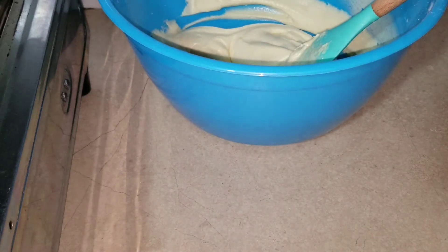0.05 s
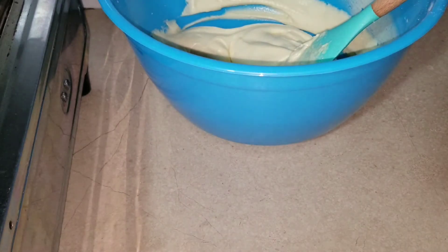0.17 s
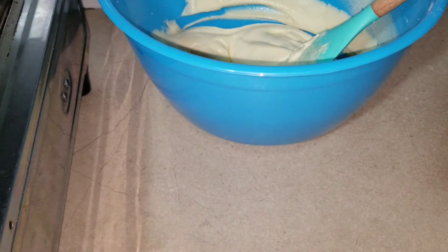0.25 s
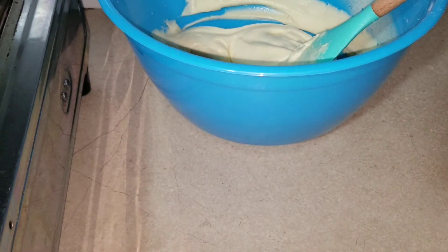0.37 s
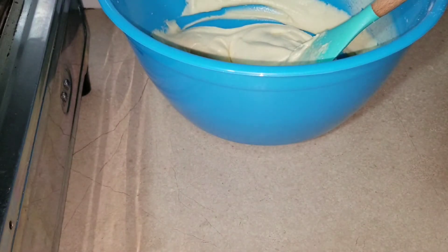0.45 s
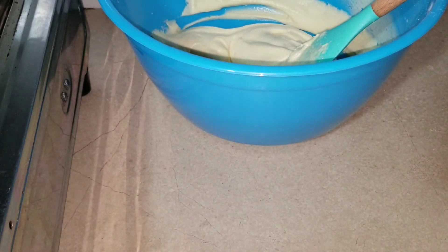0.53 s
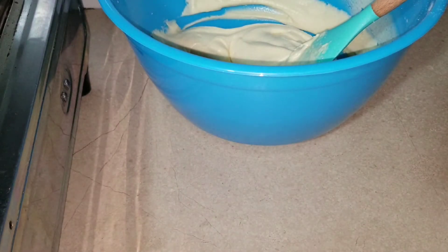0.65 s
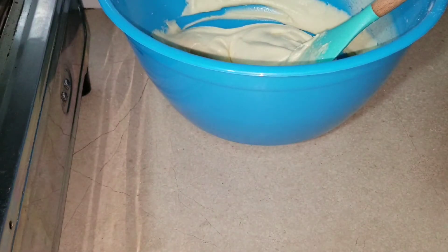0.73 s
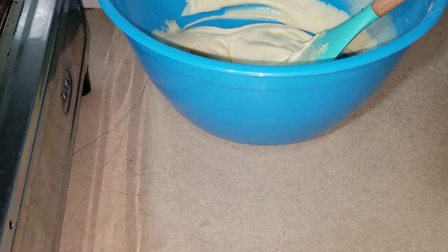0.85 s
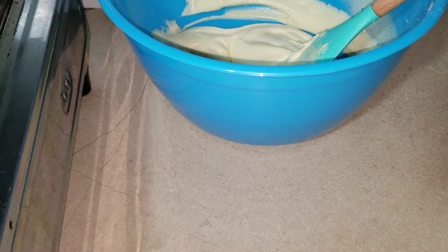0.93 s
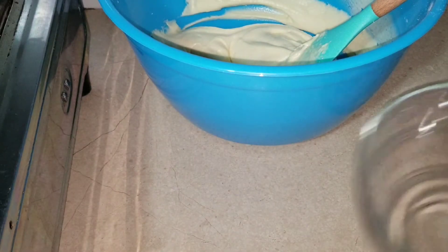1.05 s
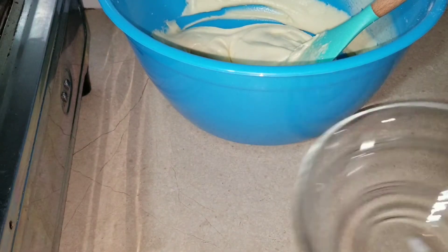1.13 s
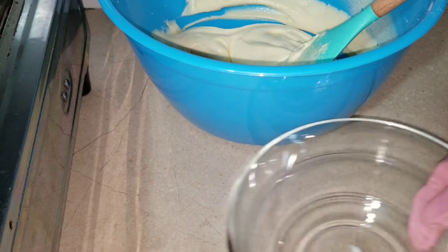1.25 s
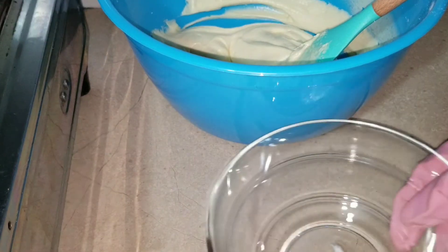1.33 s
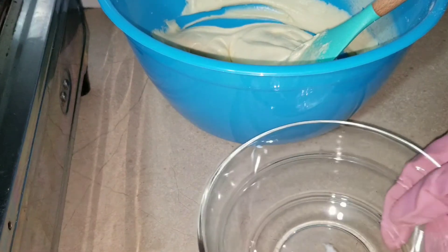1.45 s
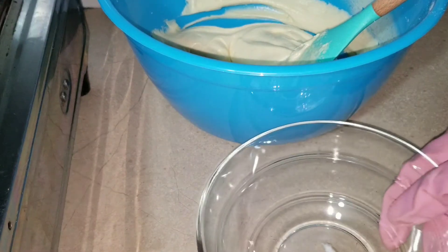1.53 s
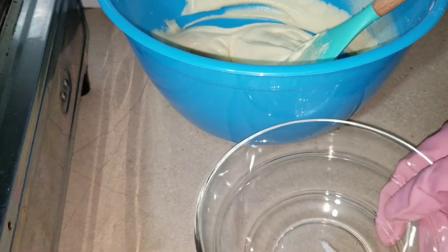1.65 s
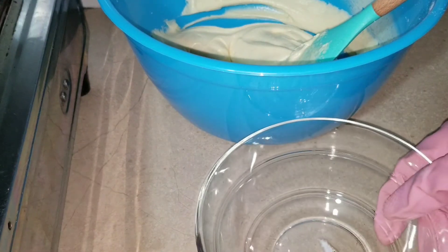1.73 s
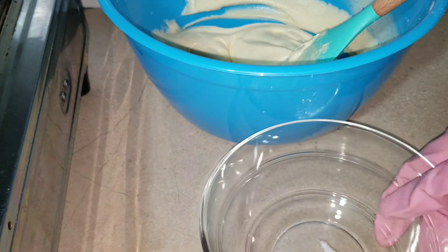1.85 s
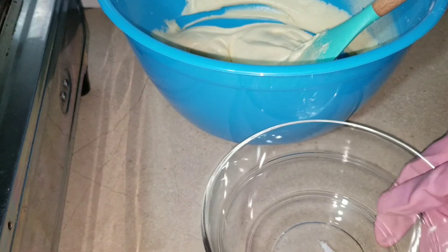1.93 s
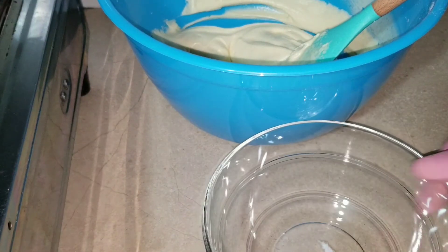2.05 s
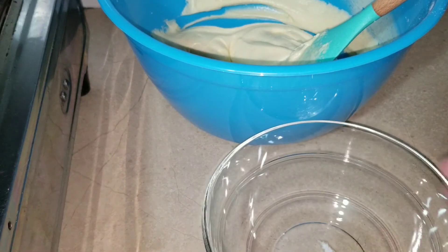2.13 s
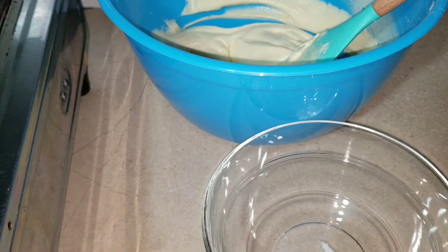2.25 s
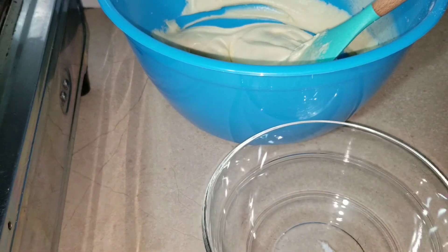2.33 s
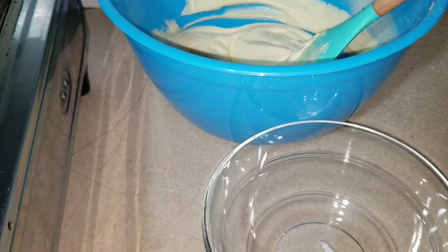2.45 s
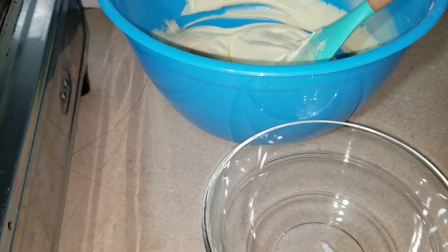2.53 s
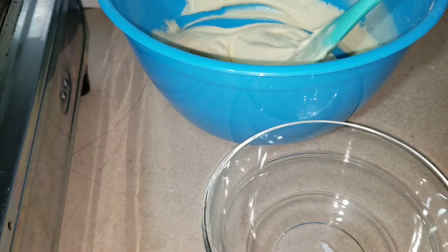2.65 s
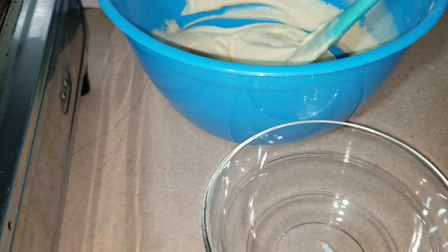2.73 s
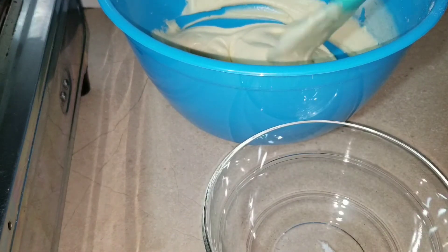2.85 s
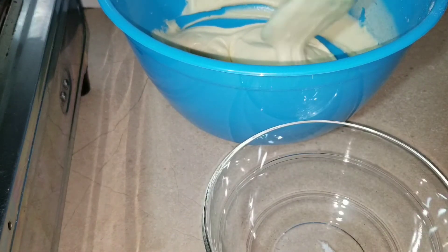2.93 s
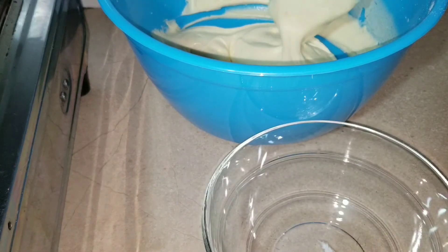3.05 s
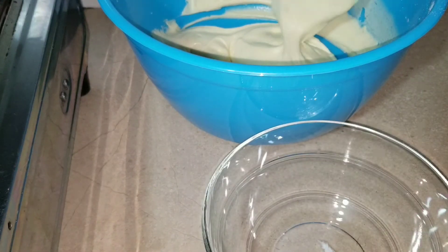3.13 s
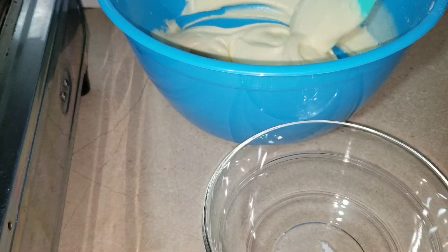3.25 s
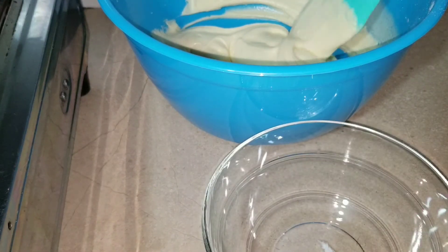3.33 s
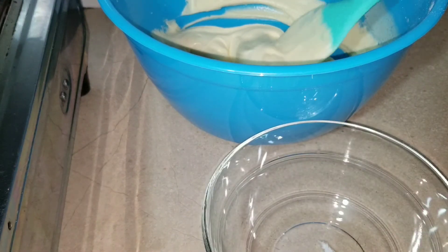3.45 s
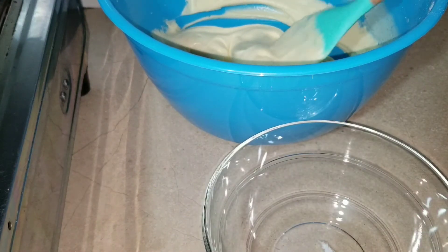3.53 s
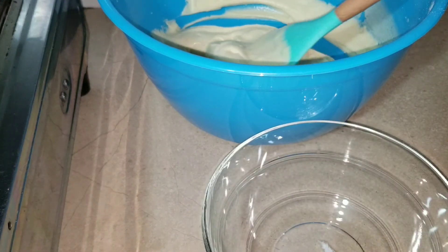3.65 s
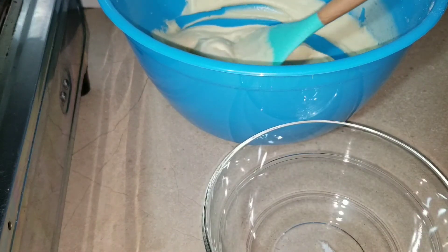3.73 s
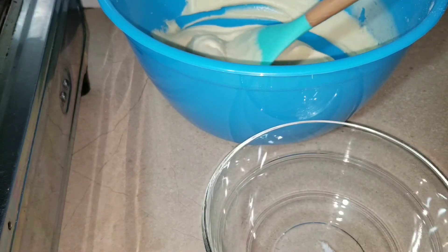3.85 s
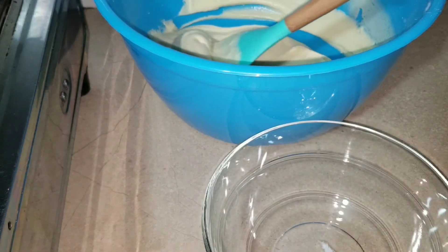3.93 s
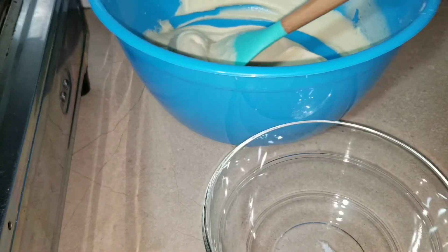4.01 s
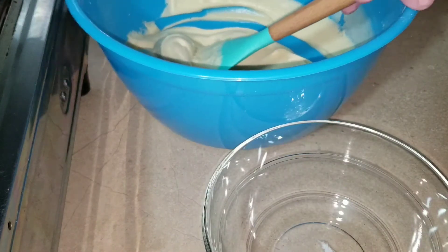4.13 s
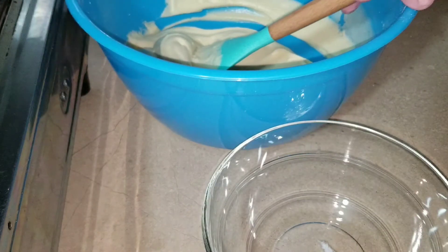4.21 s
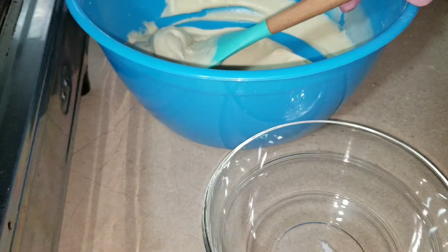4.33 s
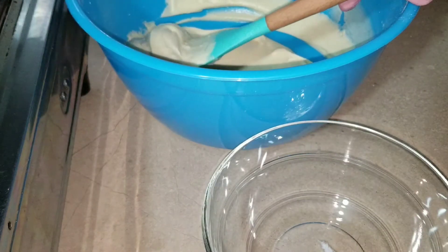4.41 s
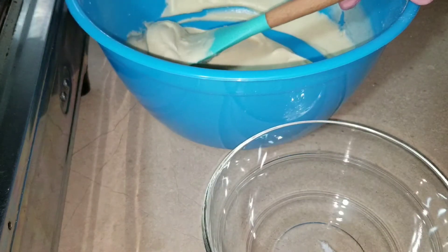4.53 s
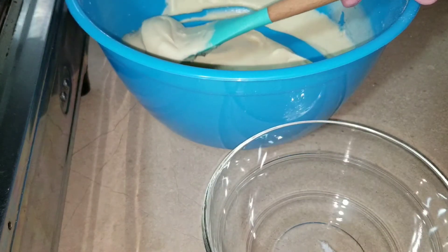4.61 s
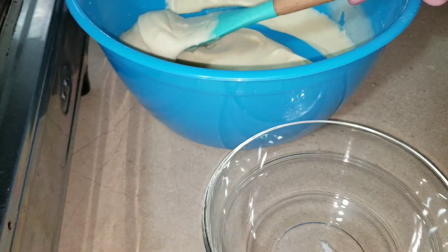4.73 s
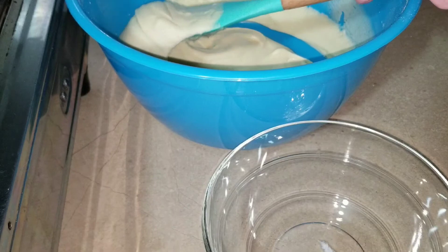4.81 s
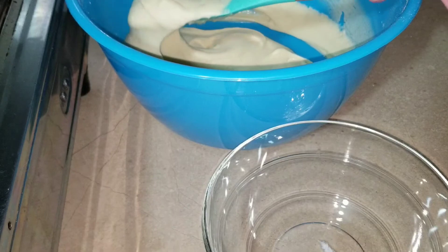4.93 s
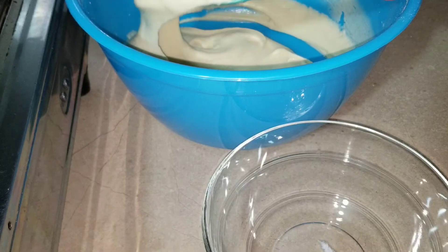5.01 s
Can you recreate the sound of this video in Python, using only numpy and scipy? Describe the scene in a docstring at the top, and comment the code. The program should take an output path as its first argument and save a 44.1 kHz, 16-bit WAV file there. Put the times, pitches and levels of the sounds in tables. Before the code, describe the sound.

A close stereo pickup in a small, hard kitchen, with a quiet low appliance rumble and wavering drone throughout. For the first 1.4 s there are only hum swells and very faint rubber-glove rustles and wet batter sounds. At 1.45 s a glass bowl hits the counter: about six uneven knocks until 1.57 s, hard and mid-pitched near 900 Hz, with cabinet thud and hand-damped glassy pings. At 1.81 s it drops flat in a double knock, rattling quickly to rest by about 1.93 s, with a thin, freer glass ring fading briefly. Small ticks, squelches and a soft rustle follow at 2.0-2.45 s. A dull, moderately firm spatula knock on the plastic bowl comes at 3.10 s with a softer one just after, then a lower thump and small clicks at 3.39-3.47 s. A soft, smooth sliding hiss runs 3.8-4.06 s. Then mostly hum, with a barely audible squelch near 5.03 s.

```python
"""Glass bowl on a kitchen counter

A glass mixing bowl, held in a rubber glove, clatters onto a counter, then drops flat and rings.
A spatula knocks in the plastic bowl of batter beside it, and something slides briefly over the counter.
Knocks and rings are sums of fading tones plus short noise bursts; rustles, squelches and the slide are swelling noise.
An appliance hums in the small kitchen, made of coloured noise and wavering tones."""
import sys
import numpy as np
from scipy import signal
from scipy.io import wavfile
from scipy.ndimage import uniform_filter1d

SR = 44100
rng = np.random.default_rng(int(sys.argv[2]) if len(sys.argv) > 2 else 0)


def wrap_up_sound(samples):
    """Save the sound to the file named by the first command line argument, as 16-bit audio."""
    columns = np.atleast_2d(samples).T
    # keep every value between -1 and 1, then stretch to whole-number steps
    tamed = np.clip(columns, -1, 1)
    steps = np.round(tamed * 32767).astype(np.int16)
    wavfile.write(sys.argv[1], SR, steps)


N = 223656
T = np.arange(N) / SR   # time in the scene (s)
AGE = T[:SR]   # time since a blow (s)

# In tables of tones, t60 is the time to fade by 60 dB; each blow varies the levels a little.
# "dB per Hz" is the relative strength of noise; its overall level is set elsewhere.

# Third-octave noise bands. Each row: low edge in Hz, high edge in Hz, filter.
BAND_EDGES = 20 * 2 ** (np.arange(30) / 3)
BANDS = [(low, high, signal.butter(2, [low, high], "band", fs=SR, output="sos"))
         for low, high in zip(BAND_EDGES, BAND_EDGES[1:])]
# How alike left and right are in noise. Each row: frequency in Hz, likeness from 0 to 1.
STEREO_LIKENESS = [(50, 0.94), (150, 0.91), (300, 0.99), (600, 0.098), (2000, 0.011), (10000, .02)]

# Deep bass of the appliance. Each row: frequency in Hz, strength in dB per Hz.
BASS_COLOUR = [(20, -4), (30, -4.5), (40, -6), (52, -1.5), (65, 2), (90, -26.5)]
# Its changing level, before a small trim. Each row: time in seconds, level in dB.
BASS_LEVEL = [(0.0, -59), (0.27, -52), (0.55, -66), (1.79, -61.5), (2.26, -63), (2.51, -53.5),
              (3.59, -51.5), (3.95, -58), (5.07, -57.5)]
# Steady rumble above the bass. Each row: frequency in Hz, strength in dB per Hz.
RUMBLE_COLOUR = [(60, -8.5), (80, 7), (105, 0.5), (125, 10), (150, -11.5), (200, -23)]
# Upper part of the drone. Each row: frequency in Hz, strength in dB per Hz.
DRONE_COLOUR = [(230, -19), (320, -1), (420, -1.5), (490, -9), (580, 0), (700, -9), (900, -38.5),
                (1500, -36)]
# Lower part of the drone. Each row: frequency in Hz, strength in dB per Hz.
LOW_DRONE_COLOUR = [(120, -12), (160, -5), (215, -2), (270, 6), (340, -24.5)]
# Changing level of the drone. Each row: time in seconds, level in dB.
DRONE_LEVEL = [(0, -57.5), (2.2, -60), (2.7, -61), (5.07, -61.5)]
# Faint hiss. Each row: frequency in Hz, strength in dB per Hz.
HISS_COLOUR = [(700, 6), (1500, 4.5), (2800, 2.5), (4500, 0.5), (7400, -1.5), (8400, -5.5), (13000, -3)]
# Humming tones of the appliance. Each row: frequency in Hz, average level in dB.
HUM_TONES = [(51.5, -60), (120, -61.5), (209, -68.5), (254, -68), (570, -71)]
# Passing swells of the hum. Each row: middle in seconds, half length in seconds, level in dB, centre in Hz.
HUM_SWELLS = [(0.173, 0.18, -50.5, 183.7), (0.304, 0.37, -57.5, 441), (0.406, 0.17, -48, 118),
              (0.953, 0.3, -56, 160.6), (2.159, .2, -59, 348.6), (2.562, 0.16, -45.5, 108.5)]
RUMBLE_DB, HISS_DB = -56, -74.5   # steady levels
LOW_DRONE_DB = 0   # relative to the upper drone

# Close surfaces. Each row: left delay in seconds, right delay in seconds, level in dB.
ECHOES = [(.0024, 0.0028, -26), (.0063, 0.0042, -10)]
# Fading of the room. Each row: frequency in Hz, t60 in seconds.
ROOM_T60 = [(100, 0.24), (300, 0.36), (900, .25), (2000, 0.28), (5000, 0.25), (12000, 0.19)]
# Colour of the room. Each row: frequency in Hz, level in dB.
ROOM_COLOUR = [(80, -4.5), (300, 0.5), (900, -1), (2000, -3), (5000, -1), (13000, 3)]
CUTOFF_HZ = 13000

# Colour shared by ticks, rustles and squelches. Each row: frequency in Hz, level in dB.
CONTACT_COLOUR = [(700, 17), (1100, 11.5), (2000, 4), (4000, 0.5), (7200, 2.5), (8400, -3.5), (11000, -4)]
# Soft rustles: the glove rubbing, and batter being lifted.
# Each row: middle in seconds, half length in seconds, level in dB, centre in Hz.
RUSTLES = [(0.016, .07, -67.5, 3400), (0.381, 0.24, -79.5, 5270), (0.577, .036, -69, 2400),
           (1.074, .021, -69.5, 6500), (2.196, .04, -63.5, 2550), (2.281, 0.28, -72, 3900),
           (2.926, .09, -76.5, 2520), (3.431, 0.065, -68.5, 2300)]
# Brief wet squelches of the batter. Each row: middle in seconds, half length in seconds, level in dB.
SQUELCHES = [(0.336, 0.015, -69.5), (0.494, 0.012, -69), (2.172, 0.0066, -55), (2.234, 0.005, -61),
             (2.364, 0.0088, -59), (2.429, 0.016, -61.5), (5.028, 0.052, -76)]
RUSTLE_OCTAVES = 1   # width of a rustle
SQUELCH_HZ, SQUELCH_OCTAVES = 1930, 0.22   # centre and width

# One short push over the counter. Each row: frequency in Hz, strength in dB per Hz.
SLIDE_COLOUR = [(710, -8.5), (1200, -9.5), (1790, -8.5), (1860, 18.5), (2510, -9), (2660, -4), (4050, -3),
                (4660, 0), (13000, -6)]
SLIDE_START_S, SLIDE_END_S, SLIDE_DB = 3.806, 4.06, -54.5
SLIDE_ATTACK_S, SLIDE_RELEASE_S = 0.085, 0.075

# Spatula and fingers on the plastic bowl. Each row: start in seconds, body level in dB, body treble limit in Hz,
# tick level in dB, tick centre in Hz, tick width in octaves, handle level in dB.
TAPS = [(2.032, -55, 1500, -52, 1730, 0.26, -60), (2.386, -57, 2500, -46, 4230, 0.78, -64),
        (2.394, -74, 1790, -42.5, 2050, 0.43, -58), (3.098, -35.5, 3040, -42, 2130, 0.85, -46),
        (3.1356, -45, 1500, -55, 1500, 0.55, -63.5), (3.392, -39.5, 420, -50.5, 2390, .57, -48),
        (3.408, -61, 450, -60, 2130, 0.41, -51.5), (3.447, -57.5, 890, -58, 1250, .3, -57),
        (3.473, -61, 990, -53.5, 2680, 0.73, -44)]
# Plastic bowl, damped by batter. Each row: frequency in Hz, level in dB, t60 in seconds, right minus left in dB.
PLASTIC_TONES = [(275, -8.5, 0.12, 8), (431, -3, 0.049, 9), (562, 1, 0.051, 8), (737, -5.5, .05, 5),
                 (843, 2.5, 0.033, 12), (897, -6.5, 0.083, 6), (962, -18, 0.082, 2), (1045, 3, 0.042, 3),
                 (1536, -10, 0.066, -4), (1717, -6, .04, 8)]
# Dry thump under the plastic tones. Each row: frequency in Hz, strength in dB per Hz.
THUMP_COLOUR = [(200, 3), (550, -0.5), (1000, -44), (1700, 9), (3000, 5)]
# Wooden spatula handle. Each row: frequency in Hz, level in dB, t60 in seconds, right minus left in dB.
HANDLE_TONES = [(1803, -3.5, 0.026, 6.5), (2050, 1, 0.033, 5), (2392, -2, 0.028, 1), (3430, -9, 0.033, 10),
                (4100, -10.5, 0.024, 10)]
REBOUND_S, REBOUND_DB = 0.013, -16.5   # each tap touches again, softer
TAP_THUD_DB = -0.5   # the cabinet under a tap, relative to the body

# The cabinet below. Each row: frequency in Hz, level in dB, t60 in seconds, right minus left in dB.
CABINET_TONES = [(118, 0, .16, 2), (212, -21, .14, 1)]
THUD_RISE_S = 0.0086   # the heavy cabinet is slow to get going

# Touches as the foot rattles to rest. Each row: frequency in Hz, strength in dB per Hz.
SETTLE_COLOUR = [(600, 0), (1050, 5), (1700, 5), (2600, -6), (4000, -2), (7000, -27), (12000, -34)]
SETTLE_S, SETTLE_GAP_S = 1.825, 0.0085   # start, average time between touches
SETTLE_DB, SETTLE_DB_PER_S = -39, -150   # starting level and its fall, before uneven strength

# Glass bowl meets counter. Each row: start in seconds, force in dB, contact pitch in Hz, counter top in dB,
# treble limit in Hz, cabinet thud in dB, rim in dB, ping in dB, clink in dB, shimmer in dB.
# The levels after the force are relative to it.
LANDINGS = [(1.4469, -13.5, 914, 0, 3600, -11, -30, -37, -50.5, -37),
            (1.498, -14, 952, -0.5, 2700, -10.5, -38, -23.5, -35, -39),
            (1.5273, -18, 953, -1, 6520, -16, -16, -15, -20.5, -35.5),
            (1.548, -21, 990, -3, 2400, -24, -34, -42.5, -42, -47),
            (1.561, -20.5, 870, 0, 2270, -27, -30.5, -44, -44, -40),
            (1.5735, -29, 775, -5, 5200, -25, -38, -34, -39, -26),
            (1.8134, -15, 1040, -4.5, 5000, -17.5, -22.5, -24, -39, -31.5),
            (1.8162, -20, 1105, -4, 4630, -32, -33, -28.5, -50.5, -27.5),
            (1.8306, -26, 776, 0, 3000, -31, -50, -59, -44, -43),
            (1.842, -26, 860, 3, 3500, -21.5, -49, -48, -49, -41.5)]
# Bowl foot and counter top together. Each row: frequency in Hz, level in dB, t60 in seconds, right minus left in dB.
COUNTER_TONES = [(352.5, -29, 0.11, 10), (450.3, -28, 0.12, 11), (480, -26.5, 0.17, 4.5),
                 (547, -23.5, .11, 6), (636, -24, .07, 8), (788, -16, .065, 10), (954, -26.5, .1, 5),
                 (1005, -27, .08, 2.5), (1074, -17, 0.031, 3.5), (1384, -20, 0.047, 0),
                 (1550, -16.5, 0.042, 4.5), (1703, -25, .045, -2), (1797, -19, 0.048, 8.5),
                 (2013, -20.5, 0.053, 11), (2190, -22, .043, 2)]
# Crack of a hard contact. Each row: frequency in Hz, strength in dB per Hz.
CRACK_COLOUR = [(150, -10), (540, -6.5), (950, 5), (2000, 0.5), (2900, -17), (4500, -20), (7000, -7.5),
                (8000, -26.5), (10000, -13), (13000, -5)]
# The slab booms on in many close tones. Each row: frequency in Hz, strength in dB per Hz.
SLAB_COLOUR = [(180, -6), (350, 0), (600, 0.5), (1000, 0.5), (1300, -5), (1900, 4), (2400, -12), (2900, -3)]
CONTACT_T60, CONTACT_DB = 0.014, 5.5   # short pitched knock (s, dB relative to the force)

# For the glass tables, t60 holds before the hand's damping.
# Slow bending of the rim; its strongest tone is a close pair that swells and fades.
# Each row: frequency in Hz, level in dB, t60 in seconds, right minus left in dB.
RIM_TONES = [(706, -5, .7, 2), (1586, 4.5, .42, 2), (1581, .5, .42, 2), (1868, -9, .2, 2),
             (2003, -11, .12, 2), (2180, -12, .22, 2), (2470, -14, .15, 2), (2545, -15, .2, 2),
             (2632, -15, .14, 3), (2715, -15, .18, 3), (3115, -15, .16, 4), (3488, -21, .13, 4)]
# Bright wall tones, split into close pairs by uneven thickness.
# Each row: frequency in Hz, level in dB, t60 in seconds, right minus left in dB.
PING_TONES = [(5551, 0, .15, 7), (5762, -9, .05, 5), (5639, -8, .09, 5), (5490, -13, .07, 5),
              (5930, -6, .035, 5), (6260, -11, .03, 5)]
# Higher wall tones. Each row: frequency in Hz, level in dB, t60 in seconds, right minus left in dB.
CLINK_TONES = [(8425, -3, .25, 1), (8560, -9, .05, 2), (8461, 0, .17, 3)]
# Highest wall tones. Each row: frequency in Hz, level in dB, t60 in seconds, right minus left in dB.
SHIMMER_TONES = [(8511, -3, .17, -2), (8610, -7, .09, 1), (9400, -10, .2, 0), (9857, -3, .11, 0),
                 (9965, -2, .16, -3), (10010, -4, .15, -2), (11165, -4, .11, 0), (11040, -8, .08, 0),
                 (12042, -6, .08, 0), (12360, -6, .14, 0)]
HELD_DAMPING, LOOSE_DAMPING = 30, 1.5   # by the hand (1/s)
WALL_DAMPING_SHARE = 0.66   # the hand damps the wall less than the rim
LOOSEN_S = 1.7   # the grip loosens before the last drop
CHATTER_DEPTH, CHATTER_PER_S = 0.25, 220   # spread of the flutter, random points per second


def from_db(db):
    """Turn decibels into gain."""
    return 10 ** (np.asarray(db) / 20)


def rms_one(x):
    """Scale a sound to an average strength (rms) of 1."""
    return x / np.sqrt(np.mean(x ** 2) + 1e-20)


def at_hz(points, hz):
    """Read a table between its points, on a log-frequency axis."""
    table_hz, value = np.transpose(points)
    return np.interp(np.log(hz), np.log(table_hz), value)


def pan(right_db):
    """Give left and right gains that differ by this many decibels."""
    return from_db(np.array([[-.5], [.5]]) * right_db)


def add(out, s, sound):
    """Mix a sound in from time s."""
    start = round(s * SR)
    out[:, start:start + sound.shape[-1]] += sound[..., :N - start]


def bell(t, middle, half):
    """Rise and fall smoothly around the middle."""
    return np.exp(-((t - middle) / half) ** 2 / 2)


def drift(rate):
    """Wander slowly and randomly, with rms 1 and `rate` random points per second."""
    knots = rng.standard_normal(256)
    return rms_one(np.interp(T * rate, np.arange(len(knots)), knots))


def noise(spectrum, size=N, t60=None):
    """Stereo noise of rms 1, built from bands with their own likeness and, if given, fading."""
    out = 0
    white = rng.standard_normal((2, 2, size + 4096))   # the extra start lets the filters settle
    for k, (low, high, band_pass) in enumerate(BANDS):
        hz = np.sqrt(low * high)
        if high < spectrum[0][0] or low > spectrum[-1][0]:
            continue
        # Neighbouring bands use different noise.
        mid, side = signal.sosfilt(band_pass, white[k % 2])[:, -size:]
        alike = np.clip(at_hz(STEREO_LIKENESS, hz), 0, 1)
        band = np.sqrt(1 + alike) * mid + np.sqrt(1 - alike) * side * [[1], [-1]]
        fade = 1 if t60 is None else np.exp(-np.log(1000) * T[:size] / at_hz(t60, hz))
        out = out + from_db(at_hz(spectrum, hz)) * band * fade
    return rms_one(out)


def hump(hz, octaves):
    """A hump-shaped noise spectrum, tinted by the colour of the contact."""
    grid = np.geomspace(400, 14000, 30)
    hump_db = -30 * np.log10(1 + (np.log2(grid / hz) / octaves) ** 2 / 2)
    return np.column_stack([grid, hump_db + at_hz(CONTACT_COLOUR, grid)])


def ring(modes, damping=0, port_s=0.0002):
    """A struck object rings in fading tones of alternating sign, which reach the left side later."""
    spread_db = rng.standard_normal(len(modes))
    age = np.maximum(AGE - [[port_s], [0]], 0)
    out = 0
    for k, (hz, db, t60, right_db) in enumerate(modes):
        gain = (-1) ** k * from_db(db + spread_db[k]) * pan(right_db)
        fade = np.exp(-(np.log(1000) / t60 + damping) * age)
        out = out + gain * np.sin(2 * np.pi * hz * age) * fade
    return out


def burst(spectrum, t60):
    """Many short-lived tones merge into a crack, made here as fading noise."""
    size = SR // 10
    crack = np.pad(noise(spectrum, size=size), ((0, 0), (0, SR - size)))
    return crack * np.exp(-np.log(1000) * AGE / t60)


def soften(x, hz):
    """A longer contact excites less treble, so cut above this limit."""
    return signal.sosfilt(signal.butter(2, min(hz, SR / 2 - 1000), fs=SR, output="sos"), x)


def background(bass_trim_db=1):
    """The appliance's rumble, drone and wavering hum, under a faint hiss."""
    bass_db = np.interp(T, *np.transpose(BASS_LEVEL)) + bass_trim_db
    drone_db = np.interp(T, *np.transpose(DRONE_LEVEL))
    rumble = from_db(bass_db) * noise(BASS_COLOUR) + from_db(RUMBLE_DB) * noise(RUMBLE_COLOUR)
    drone = from_db(drone_db) * (from_db(LOW_DRONE_DB) * noise(LOW_DRONE_COLOUR) + noise(DRONE_COLOUR))
    hiss = from_db(HISS_DB) * noise(HISS_COLOUR)
    hum = 0
    for hz, db in HUM_TONES:
        level = from_db(db + 2 * drift(4.2)) * np.sqrt(2)   # a sine of rms 1 peaks at sqrt(2)
        hum = hum + level * np.sin(2 * np.pi * hz * T + 0.72 * drift(6))
    return (rumble + hum) * pan(1.6) + drone * pan(5.4) + hiss * pan(0.76)


def swells(width=0.073):
    """Narrow bands of the hum rise and sink, made as filtered noise."""
    out = 0
    for s, half, db, hz in HUM_SWELLS:
        band = signal.butter(2, hz * np.exp([-width, width]), "band", fs=SR, output="sos")
        tone = rms_one(signal.sosfilt(band, rng.standard_normal(N)))
        out = out + from_db(db) * tone * bell(T, s, half)
    return out * pan(2.3)


def reflections(x):
    """Close surfaces throw the sound back within milliseconds."""
    out = 0
    for *lags, db in ECHOES:
        echo = np.array([np.interp(T - lag, T, side, left=0) for lag, side in zip(lags, x)])
        out = out + from_db(db) * echo
    return out


def kitchen(x, room_db=-0.4, build_s=0.00037):
    """A small hard room answers with a diffuse tail, made by convolving with fading noise."""
    build_up = 1 - np.exp(-(AGE / build_s) ** 2)
    tail = noise(ROOM_COLOUR, size=SR, t60=ROOM_T60) * build_up / np.sqrt(SR)
    mono = x.mean(axis=0)[None]
    return from_db(room_db) * pan(1.0) * signal.fftconvolve(mono, tail, axes=1)[:, :N]


def grainy_swell(s, half, hz, octaves, grain_db=-3.0):
    """One soft swell around time s, made as noise of uneven, grainy strength."""
    out = np.zeros((2, N))
    t = T[np.abs(T - s) < 3 * half]
    unevenness = rms_one(uniform_filter1d(rng.standard_normal(len(t)), size=150))
    grain = from_db(grain_db * unevenness)
    add(out, t[0], noise(hump(hz, octaves), size=len(t)) * grain * bell(t, s, half))
    return out


def rustles():
    """The glove rubs and batter is lifted, in broad, soft swells of noise."""
    return pan(8.7) * sum(from_db(db) * grainy_swell(s, half, hz, RUSTLE_OCTAVES) for s, half, db, hz in RUSTLES)


def squelches():
    """The wet batter squelches briefly, in narrow swells of noise."""
    return pan(6.8) * sum(from_db(db) * grainy_swell(s, half, SQUELCH_HZ, SQUELCH_OCTAVES)
                          for s, half, db in SQUELCHES)


def slide():
    """Fine friction on the counter: a smooth hiss that swells with speed."""
    out = np.zeros((2, N))
    time_left = SLIDE_END_S - SLIDE_START_S - AGE
    ramp = np.clip(np.minimum(AGE / SLIDE_ATTACK_S, time_left / SLIDE_RELEASE_S), 0, 1)
    speed = np.sin(np.pi / 2 * ramp) ** 2
    add(out, SLIDE_START_S, from_db(SLIDE_DB) * speed * noise(SLIDE_COLOUR, size=SR))
    return out * pan(0.96)


def thud():
    """The cabinet swells into a low hum and dies away."""
    return ring(CABINET_TONES) * (1 - np.exp(-AGE / THUD_RISE_S))


def plastic_bowl(tick_t60=0.046, thump_db=-4, thump_t60=0.069):
    """Dull knocks of the bowl reach the cabinet; each rings the handle and has a dry tick and one rebound."""
    out = np.zeros((2, N))
    for s, body_db, limit_hz, tick_db, tick_hz, tick_octaves, handle_db in TAPS:
        thump = from_db(thump_db) * burst(THUMP_COLOUR, thump_t60) * pan(7.8)
        body = soften(ring(PLASTIC_TONES, port_s=0.00012) + thump, limit_hz)
        body = from_db(body_db) * (body + from_db(TAP_THUD_DB) * thud())
        add(out, s, from_db(handle_db) * ring(HANDLE_TONES, port_s=0.00012))
        for delay, db in ((0, 0), (REBOUND_S, REBOUND_DB)):
            tick = from_db(tick_db) * burst(hump(tick_hz, tick_octaves), tick_t60) * pan(12.0)
            add(out, s + delay, from_db(db) * (body + tick))
    return out


def settling(touch_t60=0.011, uneven_db=-4.0, count=11):
    """After the last drop the foot rattles to rest in a quick, uneven run of fading touches."""
    out = np.zeros((2, N))
    for k, (late, strength) in enumerate(rng.uniform(-0.91, 1, (count, 2))):
        age = SETTLE_GAP_S * (k + late / 2)
        touch_db = SETTLE_DB + SETTLE_DB_PER_S * age + uneven_db * strength
        add(out, SETTLE_S + age, from_db(touch_db) * burst(SETTLE_COLOUR, touch_t60))
    return out * pan(1.8)


def counter_knocks(crack_db=-3.5, crack_t60=0.03, slab_db=-14.5, slab_t60=.1, press_s=0.00078):
    """Each landing is a short pitched knock that rings, cracks and booms on the counter and shakes the cabinet."""
    out = np.zeros((2, N))
    for s, force_db, contact_hz, counter_db, limit_hz, thud_db, *_ in LANDINGS:
        contact = ring([(contact_hz, CONTACT_DB, CONTACT_T60, 5.5)], port_s=0.00015)
        contact = contact * (1 - np.exp(-AGE / press_s))   # the force takes a moment to build
        crack = from_db(crack_db) * burst(CRACK_COLOUR, crack_t60) * pan(3.7)
        boom = from_db(slab_db) * burst(SLAB_COLOUR, slab_t60) * pan(4)
        top = ring(COUNTER_TONES, port_s=0.00011) + crack + boom
        knock = soften(contact + from_db(counter_db) * top, limit_hz)
        add(out, s, from_db(force_db) * (knock + from_db(thud_db) * thud()))
    return out


def chatter():
    """Glass touching the counter buzzes: its ring flutters randomly in strength."""
    knots = rng.standard_normal(1024)
    return 1 + CHATTER_DEPTH * np.interp(AGE * CHATTER_PER_S, np.arange(len(knots)), knots)


def glass_ring():
    """The spot that lands decides which tones of the glass ring; the hand damps them until the grip loosens."""
    out = np.zeros((2, N))
    for s, force_db, *_, rim_db, ping_db, clink_db, shimmer_db in LANDINGS:
        damping = HELD_DAMPING if s < LOOSEN_S else LOOSE_DAMPING
        rim = ring(RIM_TONES, damping=damping, port_s=.00003)
        add(out, s, from_db(force_db + rim_db) * rim)
        for modes, db in ((PING_TONES, ping_db), (CLINK_TONES, clink_db), (SHIMMER_TONES, shimmer_db)):
            wall = ring(modes, damping=WALL_DAMPING_SHARE * damping, port_s=.00003)
            add(out, s, from_db(force_db + db) * chatter() * wall)
    return out


def scene(glass_room_db=-7.5):
    """Everything on the counter sounds in the kitchen, over the background."""
    counter = counter_knocks() + settling() + plastic_bowl() + rustles() + squelches() + slide()
    glass = glass_ring()
    room = reflections(counter) + kitchen(counter + from_db(glass_room_db) * glass)
    return counter + glass + room + background() + swells()


def record(dry):
    """Cut the top of the treble steeply."""
    return signal.sosfilt(signal.ellip(10, .2, 70, CUTOFF_HZ, fs=SR, output="sos"), dry)


dry = scene()
out = record(dry)
wrap_up_sound(out)
```